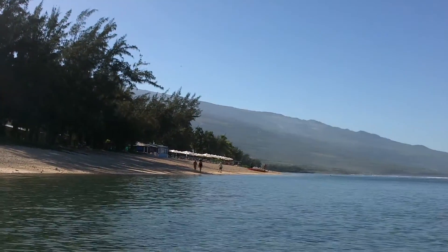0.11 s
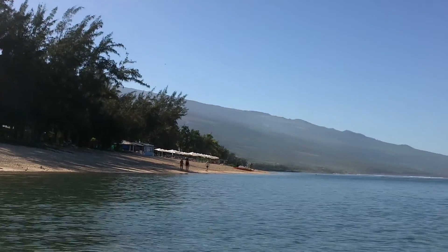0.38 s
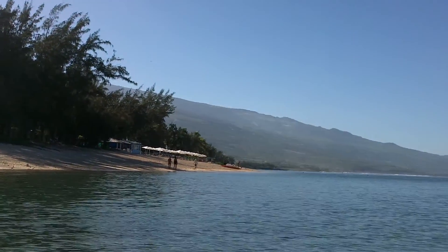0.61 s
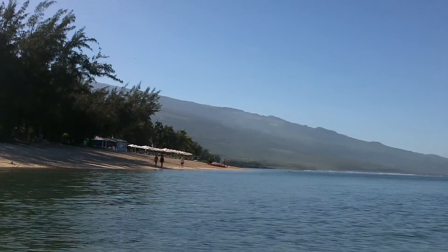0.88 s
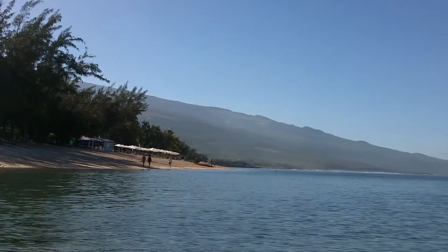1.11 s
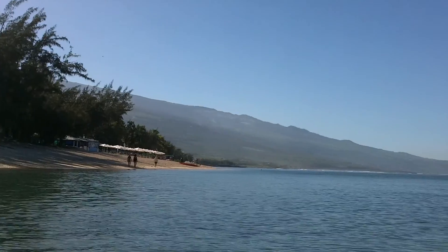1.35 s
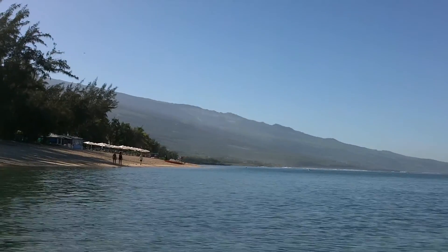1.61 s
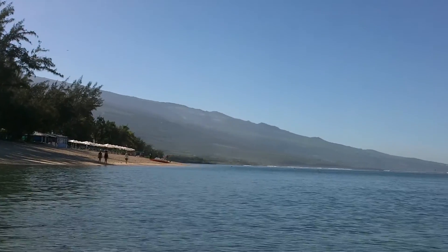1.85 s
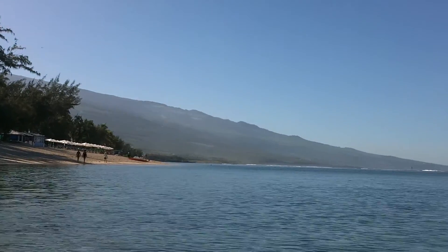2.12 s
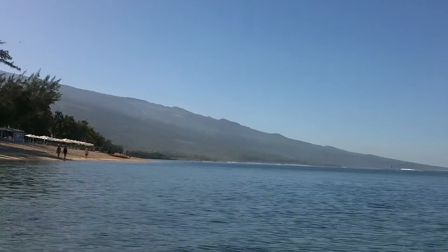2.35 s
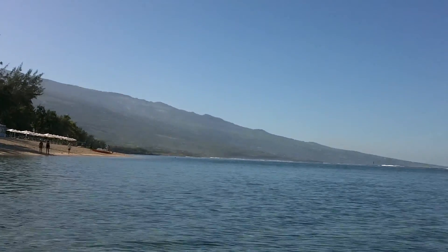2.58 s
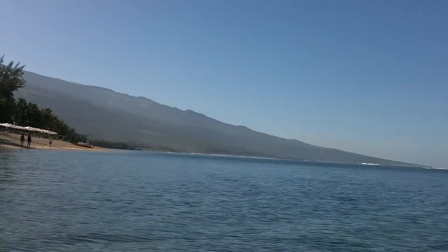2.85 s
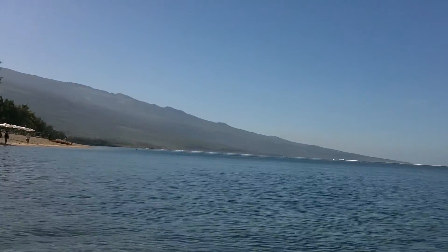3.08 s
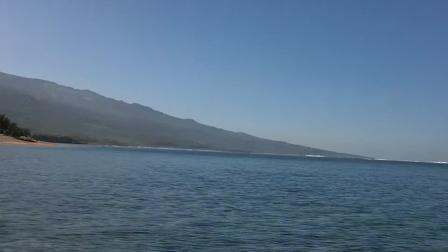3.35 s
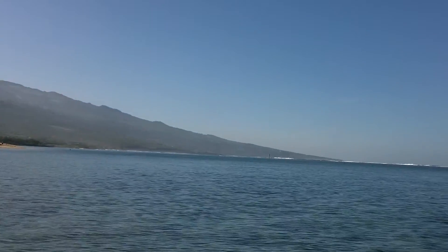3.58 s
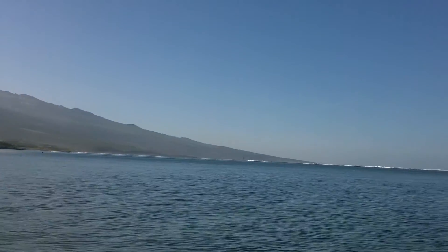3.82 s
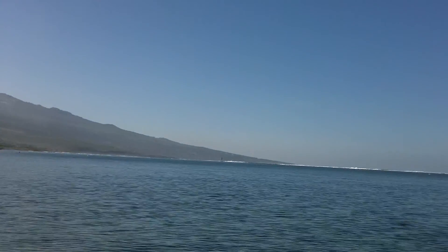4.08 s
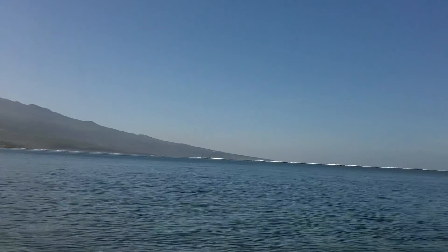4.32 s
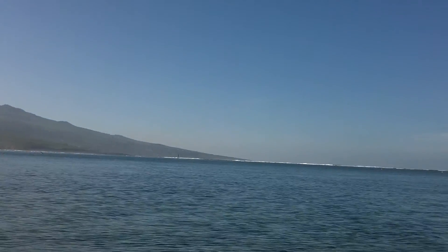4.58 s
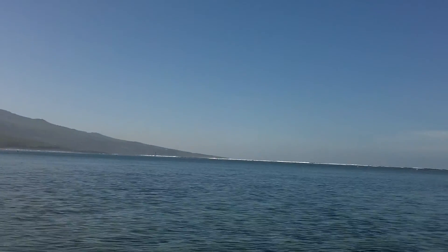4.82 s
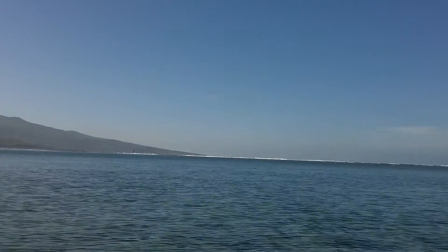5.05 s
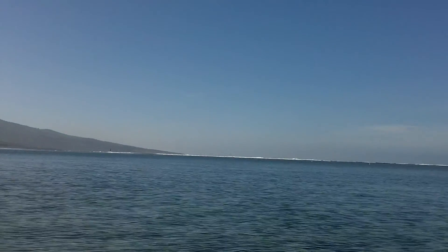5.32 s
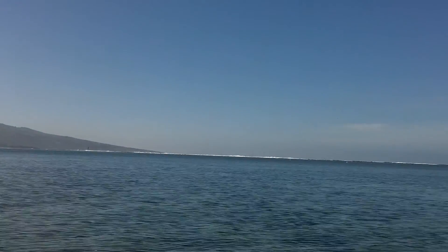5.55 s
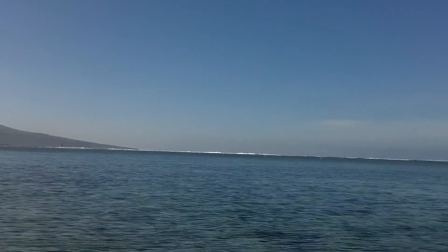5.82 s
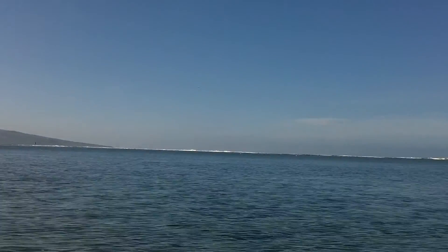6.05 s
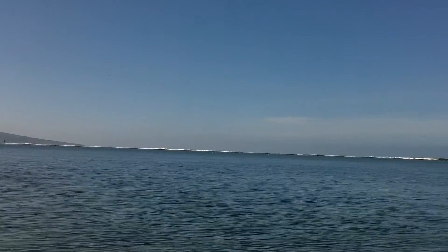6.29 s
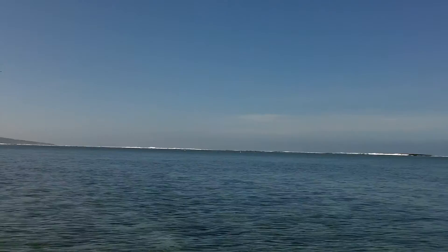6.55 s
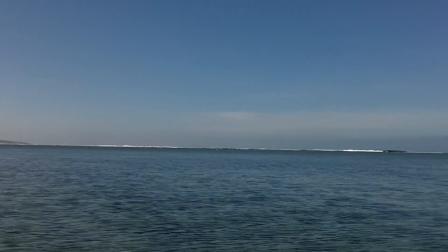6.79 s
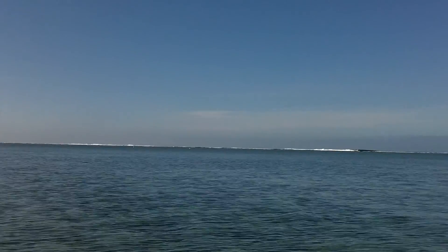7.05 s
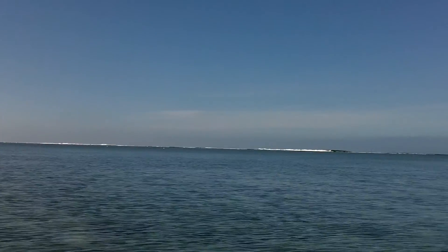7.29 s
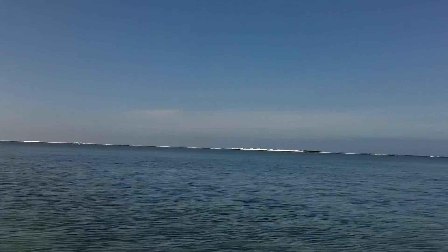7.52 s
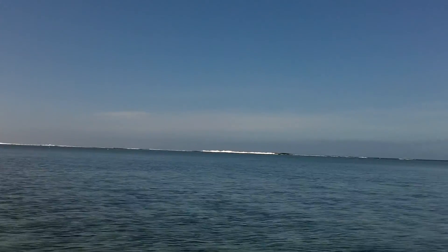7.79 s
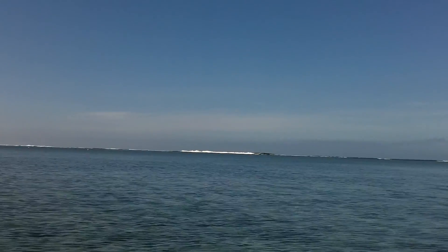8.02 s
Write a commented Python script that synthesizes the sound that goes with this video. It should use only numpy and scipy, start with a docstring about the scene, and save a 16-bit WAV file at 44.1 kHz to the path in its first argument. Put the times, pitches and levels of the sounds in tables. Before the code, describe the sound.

Calm lagoon shore with steady distant surf roar, low buffeting wind, a faint helicopter hum, scattered small-bird chirps and little waves lapping with bubbly drops.

```python
"""A lagoon heard from the shallows. Throughout: reef roar and wind (shaped noise), breeze in the trees,
a distant helicopter (rotor harmonics), camera hiss, whines and ticks. Low coos, chips and a two-voiced churr
open it; wind rumble is strong near 2 s, a breaker swells at 2.3-3.2 s and a wave washes the sand at 3.3 s,
crackling with bubbles. Wind strikes the microphone at 4.1 s; birds go on (bent sines with tree echo); the largest
wave breaks at 6.7 s with loud drops, beside a second breaker swell; short whistles close it."""
import sys
import numpy as np
from scipy import signal
from scipy.fft import rfft, irfft, next_fast_len
from scipy.io import wavfile
from scipy.ndimage import uniform_filter1d

SR = 44100
rng = np.random.default_rng(int(sys.argv[2]) if len(sys.argv) > 2 else 0)


def boost_factor(decibels):
    """Convert a level in decibels to a linear amplitude factor."""
    exponent = np.asarray(decibels, float) / 20
    return 10 ** exponent


def int16_out(signal):
    """Quantize to a 16-bit WAV file."""
    q = np.round(np.clip(np.atleast_2d(signal).T, -1, 1) * 32767)
    wavfile.write(sys.argv[1], SR, q.astype(np.int16))


N = 359415
TIME = np.arange(N) / SR
STEP = 64  # samples between points of slow random motion

# Noise colours: (frequency [Hz], relative density [dB per Hz])
HISS_COLOUR = [(3000, -12.5), (6500, 2.5), (7100, -6), (7800, -27), (8600, -3.5), (9500, 0.5),
               (12000, -1.5), (14950, 1.5), (15050, -3), (15300, -4)]
TREES_COLOUR = [(1000, 2), (2000, 2.5), (3500, -1), (4900, -4), (5100, -10.5), (7000, -21.5), (7800, -46)]
WIND_COLOUR = [(8, -14), (20, 2), (40, -9), (80, -13), (160, -19), (400, -49)]
REEF_COLOUR = [(30, -15), (100, 2), (250, 0), (400, -6.5), (700, -10.5), (1200, -17), (2000, -32),
               (4000, -44), (8000, -62)]
BREAKER_COLOUR = [(120, -18), (250, -4), (400, -0.5), (600, -8.5), (900, -26)]
WASH_COLOUR = [(300, -27.5), (800, 5), (1500, 0.5), (2200, -6.5), (3500, -14.5)]
SPRAY_COLOUR = [(1200, -13.5), (2200, -1.5), (3000, -1.5), (4800, -6.5), (5200, -18), (7000, -29),
                (7800, -54)]

# Camera whines: (mean frequency [Hz], mean peak level [dB])
WHINES = [(4736, -81.5), (6593, -87.5), (7100, -92), (9470, -102), (9850, -99)]
# Rings making up a tick: (frequency [Hz], level [dB])
TICK_RINGS = [(7000, -71), (8400, -80.5)]
# Notches of the microphone housing: (frequency [Hz], width [Hz])
HOUSING_NOTCHES = [(4200, 648), (8800, 757), (12580, 440), (12790, 200)]
HISS_DB, TREES_DB = -79, -67
TICK_HZ, FIRST_TICK_S = 59.94, .0119

# Peaks of the wind rumble's level: (peak time [s], level [dB], time to fall 10 dB [s])
WIND_PEAKS = [(.18, -37, 0.46), (.9, -37, 0.26), (1.1, -38.5, 0.07), (1.27, -34, 0.08), (1.46, -35.5, 0.11),
              (1.79, -30, 0.1), (2.04, -30.5, 0.06), (2.22, -35, 0.12), (2.36, -33.5, 0.09),
              (2.68, -39.5, 0.3), (3.5, -40.5, 0.27), (3.86, -36, 0.15), (4.11, -28, 0.0662),
              (4.38, -32, 0.06), (4.65, -38.5, 0.1), (5.01, -35.5, .05), (5.4, -46, .5), (5.94, -39.5, .1),
              (6.28, -33.5, 0.1557), (6.63, -36, 0.0068), (6.97, -37, 0.07), (7.19, -43.5, .06),
              (8.12, -40.5, 0.5)]
# Buffets on the microphone: (time of sudden push [s], level before shaping [dB], time scale [s])
BUFFETS = [(4.1025, -24, .004), (4.119, -18.5, .009)]
CALM_WIND_DB = -48

# Reef roar: (time [s], level [dB])
REEF_LEVEL = [(0, -47), (1.5, -46.5), (3.2, -45.5), (3.9, -47.5), (5.1, -45), (5.9, -46.5), (6.7, -46.5),
              (7.3, -45), (8.15, -45)]
# Larger breaker collapsing on the reef: (time [s], level [dB])
BREAKER_LEVEL = [(0, -50), (1.8, -53), (2.3, -47), (2.8, -45), (3.2, -44.5), (3.6, -59), (5, -55),
                 (6.3, -54.5), (6.7, -48.5), (7.1, -55.5), (8.15, -53.5)]
# Small waves on the sand: (crest time [s], wash level [dB], spray level [dB], time to fall 10 dB [s])
WAVES = [(.4, -59, -65.5, 1.24), (1.5, -54.5, -63, .5), (2.2, -64, -66, .6), (3.33, -52, -57, .42),
         (4.6, -60.5, -72.5, 0.94), (6.15, -59, -70, .35), (6.66, -49, -54, .5), (7.55, -61, -61, .45)]
# Drops that stand out: (start time [s], peak level [dB], starting pitch [Hz])
DROPS = [(1.5395, -47, 2270), (3.2704, -46, 1930), (3.2994, -46.5, 1750), (3.449, -46, 1490),
         (6.511, -43, 2650), (6.5892, -45, 2100), (6.6623, -39, 2955), (6.7894, -46, 2600)]
CALM_WASH_DB, CALM_SPRAY_DB = -64, -70
WAVE_RISE_SHARE, SPRAY_LEAD_S = .5, .08  # rise time over fall time; spray precedes wash
BUBBLE_COUNT = 1500

# Falling chips: (time, 9 ms after onset [s], peak level [dB], reference pitch, ends at 0.985 of it [Hz])
CHIPS = [(0.345, -52.5, 5940), (0.3934, -53.5, 5970), (0.4359, -49, 6025), (0.48, -49, 6070),
         (0.831, -62.5, 6300), (0.8734, -62, 6370), (1.9007, -58, 6240), (1.943, -57, 6360),
         (2.1848, -59.5, 6260), (2.2328, -66, 6270), (2.797, -58, 6210), (2.8407, -57, 6375),
         (2.9483, -55.5, 6174), (3.0016, -58, 6316), (4.0382, -60.5, 6210), (4.0816, -66, 6470),
         (4.368, -64, 6590), (4.4214, -68, 6600), (4.4638, -57.5, 6220), (4.5109, -57.5, 6180),
         (4.9758, -58, 6100), (5.0227, -60, 6120), (5.2558, -62.5, 6290), (5.3081, -60.5, 6070),
         (5.442, -57.5, 6150), (5.4839, -60.5, 6230), (6.0645, -61, 6230), (6.115, -63, 6165),
         (6.552, -59, 6030), (6.6019, -60.5, 6180)]
# Whistles: (start time [s], length [s], start pitch [Hz], end pitch [Hz], level [dB])
NOTES = [(.127, 0.0126, 4500, 5000, -60.5), (0.167, .017, 5230, 4390, -62),
         (0.189, 0.052, 4580, 4580, -71.5), (0.197, 0.0293, 3574, 3950, -61.5), (.65, .03, 5500, 5100, -73),
         (.74, 0.053, 2790, 2514, -68), (0.809, .118, 2200, 2313, -68), (.915, .025, 5540, 5590, -74),
         (.965, 0.031, 5320, 4970, -72), (.978, 0.143, 2820, 2980, -70), (.992, .02, 5550, 5550, -72),
         (1.02, .03, 5410, 5050, -68.5), (1.253, .045, 6150, 5150, -71), (1.292, .042, 5100, 4350, -65),
         (1.377, 0.0186, 4940, 4920, -58.5), (1.409, 0.0403, 4464, 4690, -57),
         (1.733, .035, 3930, 3496, -62), (1.991, .028, 6500, 4500, -70), (2.02, .05, 5350, 5720, -74),
         (2.159, .09, 2544, 2602, -69), (2.268, .024, 2383, 2330, -65.5), (2.293, .034, 5000, 4650, -62.5),
         (2.328, .027, 5350, 5600, -70), (2.354, .038, 4680, 4500, -63), (2.385, 0.0345, 5100, 5250, -68.5),
         (2.599, 0.0217, 3960, 3900, -66), (2.619, .026, 3940, 3745, -56.5),
         (2.639, 0.0257, 3410, 3090, -66), (2.679, 0.031, 2584, 2310, -63), (2.91, .015, 7450, 7000, -72),
         (2.952, .02, 5800, 5200, -70), (2.99, .05, 5240, 5650, -73.5), (3.012, .012, 7800, 7450, -72),
         (3.59, .03, 3748, 3593, -64.5), (3.84, 0.048, 3835, 3547, -66.5), (4.015, .02, 4800, 4450, -73),
         (4.19, .04, 5380, 5380, -75), (4.32, .025, 5400, 5200, -74), (4.439, 0.019, 5500, 4400, -69),
         (4.453, 0.0193, 3820, 3670, -65), (4.477, 0.0278, 3608, 3896, -57), (4.53, .025, 5550, 5200, -72),
         (4.627, .025, 5500, 5200, -73), (4.71, .03, 5600, 5100, -72), (4.82, 0.024, 5080, 5280, -71.5),
         (5.1, .14, 4870, 4800, -76), (6.214, .02, 5200, 5900, -75), (7.28, .02, 5800, 5200, -73),
         (7.329, .04, 3710, 3966, -66), (7.379, 0.0296, 4000, 3425, -61), (7.615, 0.0397, 3890, 3400, -61),
         (7.859, 0.0155, 5010, 4200, -68), (7.863, 0.0268, 3997, 3344, -59), (7.893, .018, 3255, 2104, -60),
         (7.93, .03, 3710, 3055, -67)]
# Low dove-like calls: (start time [s], length [s], top pitch [Hz], level [dB])
COOS = [(.265, .16, 1160, -53), (.43, .035, 1060, -52), (2.115, .2, 1150, -58.5), (4.785, .28, 1115, -59.5)]
# Call pitch at even steps, quick rise then long sag: (pitch over top pitch [ratio])
COO_ARCH = (.84, 1, .99, .95, .89, .86)
# Raspy churrs: (start time [s], nominal length [s], held upper voice [dB], falling lower voice [dB])
CHURRS = [(0.674, 0.1206, -60.5, -59.5), (2.042, 0.0957, -60.5, -58.5), (3.032, 0.102, -61, -57.5),
          (4.73, .1, -61, -63), (6.245, 0.089, -58, -65.5)]
CHURR_UPPER_HZ, CHURR_FIRST_HZ, CHURR_END_HZ, CHURR_OVERTONE_HZ = 4477, 3950, 3531, 5057
RASP_NOTE, RASP_COO, RASP_CHURR, RASP_FLOCK = .42, .15, .75, .8  # phase shake [rad]
LONG_RASP_PER_S = 16  # low notes get hoarser with length
ATTACK_BEND = .7  # under 1: a note peaks before its middle
CHIP_PEAK_SHARE = .5  # loudest here, where the fall has flattened
TWITTER_COUNT = 70
ECHO_DB, ECHO_T60_S, ECHO_TOP_HZ = -5.5, .3, 7000

# Helicopter as heard: (time [s], main blade rate [Hz])
BLADE_RATE = [(0.0, 22.236), (1.5, 22.236), (3.0, 22.272), (4.5, 22.07), (6.0, 22.028), (7.0, 21.928),
              (8.15, 21.96)]
# Main rotor thump: (multiple of blade rate [-], relative level [dB])
BLADE_ORDERS = [(1, -4.5), (2, -0.5), (3, -0.5), (4, -0.5), (5, -3), (6, -3), (7, -8.5), (8, -10.5),
                (9, -13.5), (10, -16), (12, -19)]
# Main rotor: (time [s], level [dB])
BLADE_LEVEL = [(0, -48.5), (1, -46.5), (2, -44.5), (3, -45.5), (4, -47), (5, -51), (6, -49.5), (7, -49),
               (8.15, -47.5)]
# Tail rotor, swaying as air bends its path: (time [s], 2nd multiple [dB], 3rd multiple [dB])
TAIL_LEVEL = [(0, -45.5, -59), (.52, -44.5, -48.5), (1.16, -43, -52), (1.41, -48, -46), (1.95, -41, -49),
              (2.18, -42, -43.5), (3.0, -39.5, -45), (3.38, -43, -45), (3.6, -42, -44.5),
              (4.13, -44.5, -47), (4.27, -43.5, -66), (4.81, -47, -55), (5.0, -42.5, -57),
              (5.2, -44.5, -52), (6.0, -47.5, -48.5), (6.25, -41, -53), (6.46, -48, -49),
              (6.72, -44.5, -49.5), (7.08, -43.5, -47), (7.35, -48, -45.5), (7.6, -39.5, -47),
              (8.06, -44, -39.5), (8.15, -40, -42)]
FIRST_BLADE_S, TAIL_RATIO, TAIL_START_TURNS = .0067, 3.533, .38
TAIL_FIRST_DB, TAIL_FOURTH_DB = -12.5, -15  # relative to the 2nd multiple
TAIL_SWAY_DB, TAIL_SWAY_RATE_HZ = .8, 6.


def curve(table, column=1):
    """A column joined by straight lines in time."""
    points = np.array(table)
    return np.interp(TIME, points[:, 0], points[:, column])


def fine(slow):
    """Coarse motion interpolated to every sample."""
    return np.interp(np.arange(N) / STEP, np.arange(len(slow)), slow)


def walk(rate_hz):
    """Random levels held 1 / rate and slewed twice, on the coarse grid; spread near 1."""
    hold, size = max(int(SR / STEP / rate_hz), 1), N // STEP + 2
    held = np.repeat(rng.standard_normal(size // hold + 1), hold)
    slewed = uniform_filter1d(uniform_filter1d(held, hold), hold)
    return 1.303 * slewed[:size]


def rush(colour, patchy_db, rate_hz):
    """Coloured noise, rms 1; overlapping bands 1.5 octaves apart flicker independently."""
    size = next_fast_len(N, real=True)
    octave = np.log2(np.arange(size // 2 + 1) * SR / size + 1)
    hz, db = np.transpose(colour)
    gain = boost_factor(np.interp(octave, np.log2(hz), db, -90, -90))
    spectrum = rfft(rng.standard_normal(size)) * gain
    centres = np.arange(np.ceil(np.log2(hz[0])), np.log2(hz[-1]), 1.5)
    inside = np.clip(octave, centres[0], centres[-1])
    out = 0
    for centre in centres:
        distance = np.clip((inside - centre) / 1.5, -1, 1)
        share = np.cos(distance * np.pi / 2) ** 2
        flicker = fine(boost_factor(patchy_db * walk(rate_hz)))
        out = out + irfft(spectrum * share, size)[:N] * flicker
    return out / np.std(out)


def swells(calm_db, rows, rise_share=1):
    """Calm level plus peaks (peak time [s], level [dB], time to fall 10 dB [s]), summed as power."""
    power = boost_factor(calm_db) ** 2
    for s, db, fall_s in rows:
        distance_s = np.maximum(TIME - s, (s - TIME) / rise_share)
        power = power + boost_factor(db - 10 * distance_s / fall_s) ** 2
    return np.sqrt(power)


def add(out, start_s, sound):
    """Mixes a sound in at its time."""
    i = int(start_s * SR)
    out[i:i + len(sound)] += sound[:N - i]


def camera():
    """Preamplifier hiss, wavering whines and a short tick with every frame."""
    out = boost_factor(HISS_DB) * rush(HISS_COLOUR, patchy_db=0., rate_hz=8.)
    for hz, db in WHINES:
        level = fine(boost_factor(db + 1.5 * walk(30)))
        phase = 2 * np.pi * np.cumsum(fine(hz + 8 * walk(60))) / SR
        out += level * np.sin(phase)
    # seconds from the nearest tick
    t = ((TIME - FIRST_TICK_S) * TICK_HZ + .5) % 1 / TICK_HZ - .5 / TICK_HZ
    tick = np.exp(-(t / .0006) ** 2)
    rings = sum(boost_factor(db) * np.sin(2 * np.pi * hz * t) for hz, db in TICK_RINGS)
    return out + tick * rings


def trees():
    """A light breeze hisses in the needles."""
    return boost_factor(TREES_DB) * rush(TREES_COLOUR, patchy_db=0.75, rate_hz=2.0)


def wind():
    """Turbulence rumbles on the microphone; buffets are a slow suction, then a sudden push."""
    out = swells(CALM_WIND_DB, WIND_PEAKS) * rush(WIND_COLOUR, patchy_db=3.5, rate_hz=12.)
    for s, db, length_s in BUFFETS:
        t = (TIME - s) / length_s
        out += boost_factor(db) * np.tanh(4.0 * t) * np.exp(-t ** 2 / 2)
    return out


def reef():
    """Far surf: steady roar and rumble plus a larger collapsing breaker, both coloured noise."""
    roar = boost_factor(curve(REEF_LEVEL)) * rush(REEF_COLOUR, patchy_db=0.94, rate_hz=6.)
    breaker = boost_factor(curve(BREAKER_LEVEL)) * rush(BREAKER_COLOUR, patchy_db=0.9, rate_hz=6.5)
    return roar + breaker


def bubble(hz):
    """A short ring, envelope peak 1, that rises in pitch as the bubble nears the surface."""
    t = TIME[:SR // 160]
    age = t * hz / 1.29
    return age * np.exp(1 - age) * np.sin(2 * np.pi * hz * t * (1 + 30 * t))


def shore():
    """Small waves hiss up the sand; bursting bubbles crackle in the spray, single drops stand out."""
    wash = rush(WASH_COLOUR, patchy_db=0.57, rate_hz=25.)
    spray = rush(SPRAY_COLOUR, patchy_db=2.0, rate_hz=40.)
    for when, pitch, size in rng.random((BUBBLE_COUNT, 3)):
        level = boost_factor(-2.5 + 14 * size ** 3)
        add(spray, when * N / SR, level * bubble(1100 * 3.6 ** pitch))
    wash_rows = [(s, db, fall_s) for s, db, _, fall_s in WAVES]
    spray_rows = [(s - SPRAY_LEAD_S, db, fall_s) for s, _, db, fall_s in WAVES]
    out = wash * swells(CALM_WASH_DB, wash_rows, WAVE_RISE_SHARE)
    out = out + spray * swells(CALM_SPRAY_DB, spray_rows, WAVE_RISE_SHARE)
    for s, db, hz in DROPS:
        add(out, s, boost_factor(db) * bubble(hz))
    return out


def glide(length_s, *hz):
    """Position 0-1 and phase of a note whose pitch passes through the given points."""
    place = np.linspace(0, 1, int(length_s * SR))
    pitch_hz = np.interp(place, np.linspace(0, 1, len(hz)), hz)
    return place, 2 * np.pi * np.cumsum(pitch_hz) / SR


def note(length_s, db, rasp, *hz):
    """A sine through the given pitches; rasp shakes its phase and level."""
    place, phase = glide(length_s, *hz)
    shake = uniform_filter1d(rng.standard_normal((2, SR // 2)), size=90)
    shake = uniform_filter1d(shake, size=60)[:, :len(place)] * 11
    swell = np.sqrt(2 * np.sin(np.pi * place ** ATTACK_BEND))
    return boost_factor(db + 5 * rasp * shake[0]) * swell * np.sin(phase + rasp * shake[1])


def chip(db, hz):
    """A steep pitch drop that swells as it flattens out."""
    fall = np.array([1.27, 1.14, 1.035, 1.003, .99, .985, .985])
    place, phase = glide(.028, *hz * fall)
    rise = .08 + (place / CHIP_PEAK_SHARE) ** 2.2
    decay = boost_factor(-45 * (place - CHIP_PEAK_SHARE))
    return boost_factor(db) * np.minimum(rise, decay) * np.sin(phase)


def add_churr(out, s, length_s, upper_db, lower_db):
    """Two voices at once: one held with a faint overtone, one stepping down in two syllables."""
    upper, first, end = CHURR_UPPER_HZ, CHURR_FIRST_HZ, CHURR_END_HZ
    add(out, s, note(0.8 * length_s, upper_db, RASP_CHURR, .98 * upper, upper, upper))
    add(out, s + .08 * length_s,
        note(0.5 * length_s, lower_db, RASP_CHURR, .97 * first, first, .99 * first))
    add(out, s + .45 * length_s,
        note(0.6 * length_s, lower_db - 2.5, RASP_CHURR, 1.06 * end, 1.01 * end, end))
    add(out, s, note(0.57 * length_s, upper_db - 16.5, RASP_CHURR / 2, CHURR_OVERTONE_HZ, CHURR_OVERTONE_HZ))


def tree_echo(sound):
    """Scattering by the trees: convolution with decaying, low-passed noise."""
    t = TIME[:SR // 2]
    leaves = rng.standard_normal(len(t)) * boost_factor(-60 * t / ECHO_T60_S) * (t > .004)
    low_pass = signal.butter(2, ECHO_TOP_HZ, fs=SR, output="sos")
    leaves = signal.sosfilt(low_pass, leaves / np.linalg.norm(leaves))
    return boost_factor(ECHO_DB) * signal.fftconvolve(sound, leaves)[:N]


def birds():
    """Near-sine notes and raspy churrs over a faint flock, all scattered by the trees."""
    out = np.zeros(N)
    for s, db, hz in CHIPS:
        add(out, s - .009, chip(db, hz))
    for s, length_s, *hz, db in NOTES:
        hoarse = 1 + LONG_RASP_PER_S * length_s * (hz[0] < 3000)
        add(out, s, note(length_s, db, RASP_NOTE * hoarse, *hz))
    for s, length_s, hz, db in COOS:
        add(out, s, note(length_s, db, RASP_COO, *hz * np.array(COO_ARCH)))
    for row in CHURRS:
        add_churr(out, *row)
    # faint flock at random times
    for when, pitch, bend, size in rng.random((TWITTER_COUNT, 4)):
        hz = 4400 + 700 * pitch
        add(out, when * N / SR, note(0.025, -84 + 7 * size, RASP_FLOCK, hz * (1.05 + 0.11 * bend), hz))
    return out + tree_echo(out)


def helicopter():
    """Each main blade gives a push then a pull; the geared tail rotor hums and beats against it."""
    turns = np.cumsum(curve(BLADE_RATE)) / SR
    blade = 2 * np.pi * (turns - FIRST_BLADE_S * BLADE_RATE[0][1])
    unsteady = fine(boost_factor(1.43 * walk(7.2)))
    thump = -unsteady * sum(boost_factor(db) * np.sin(round(k) * blade) for k, db in BLADE_ORDERS)
    tail = 2 * np.pi * (TAIL_RATIO * turns + TAIL_START_TURNS)
    second_db, third_db = curve(TAIL_LEVEL), curve(TAIL_LEVEL, column=2)
    levels_db = [second_db + TAIL_FIRST_DB, second_db, third_db, second_db + TAIL_FOURTH_DB]
    hum = 0
    for k, db in enumerate(levels_db, start=1):
        sway_db = TAIL_SWAY_DB * fine(walk(TAIL_SWAY_RATE_HZ))
        hum = hum + boost_factor(db + sway_db) * np.cos(k * tail)
    return np.sqrt(2) * (boost_factor(curve(BLADE_LEVEL)) * thump + hum)  # rms to peak


def scene():
    """All outdoor sources, one channel."""
    return (trees() + wind() + reef() + shore() + birds() + helicopter())[None]


def band_limit(x):
    """A steep low-pass at the top of the band."""
    return signal.sosfilt(signal.butter(12, 16320, fs=SR, output="sos"), x)


def record(dry):
    """The camera's own noise joins in and narrow housing notches colour everything."""
    sound = dry + camera()
    for hz, width_hz in HOUSING_NOTCHES:
        b, a = signal.iirnotch(hz, hz / width_hz, fs=SR)
        sound = signal.lfilter(b, a, sound)
    return band_limit(sound)


dry = scene()
out = record(dry)
int16_out(out)
```